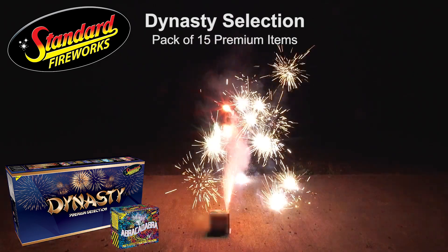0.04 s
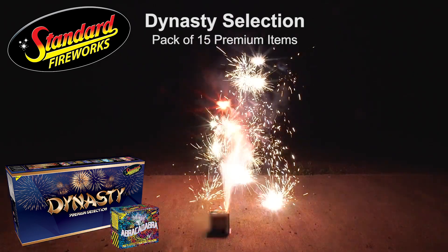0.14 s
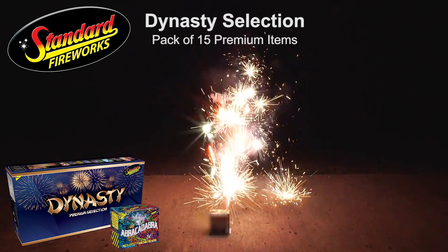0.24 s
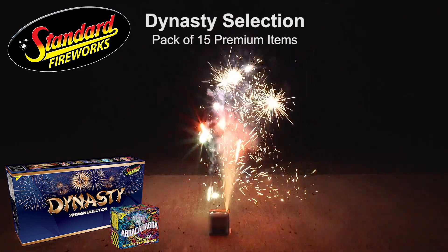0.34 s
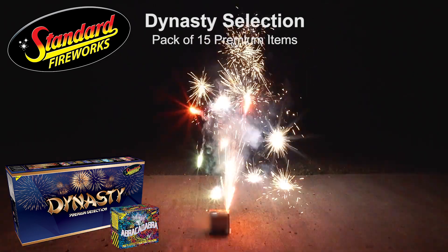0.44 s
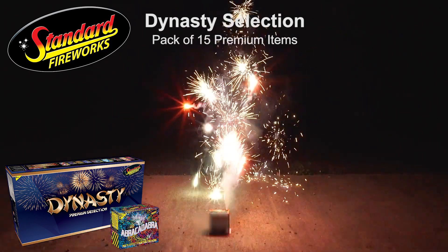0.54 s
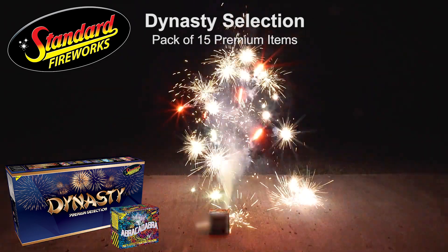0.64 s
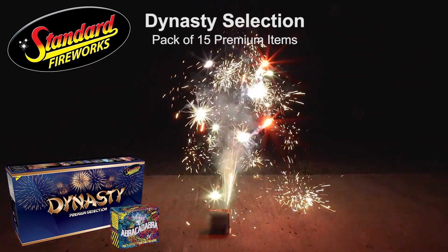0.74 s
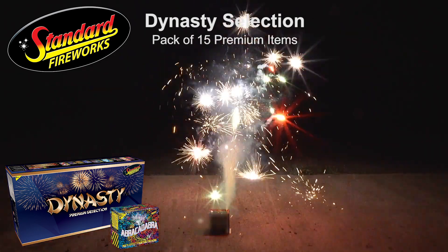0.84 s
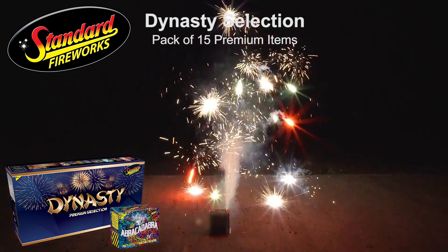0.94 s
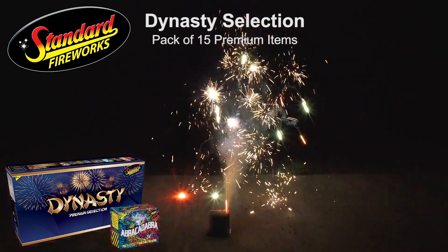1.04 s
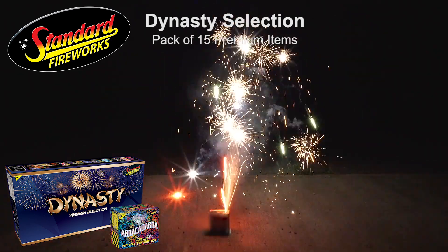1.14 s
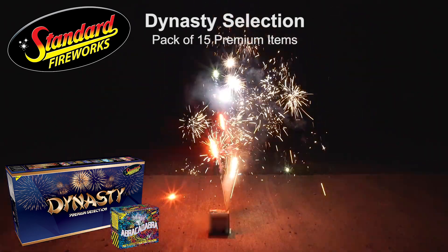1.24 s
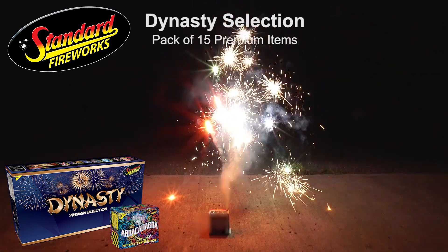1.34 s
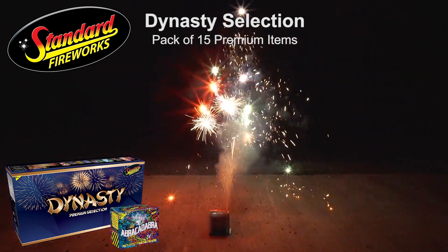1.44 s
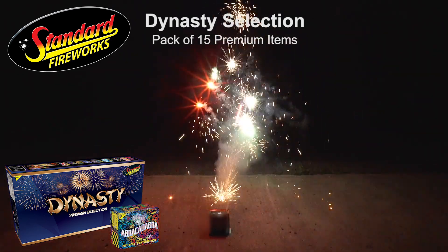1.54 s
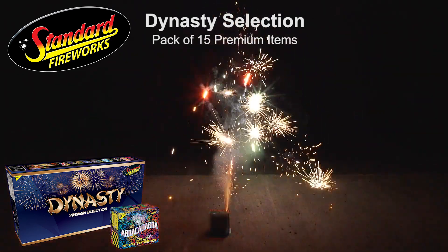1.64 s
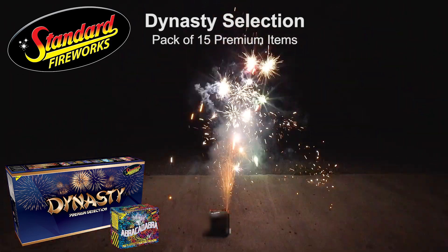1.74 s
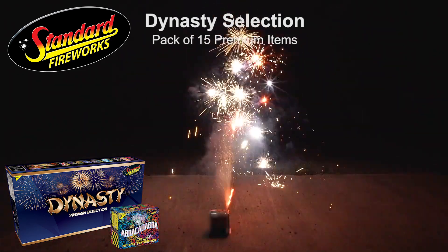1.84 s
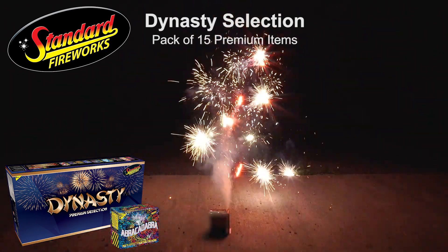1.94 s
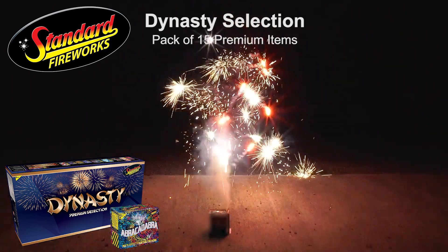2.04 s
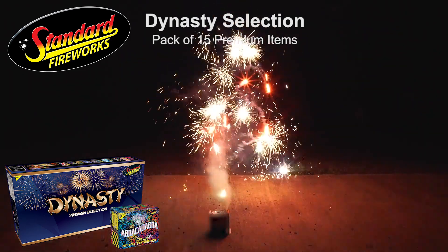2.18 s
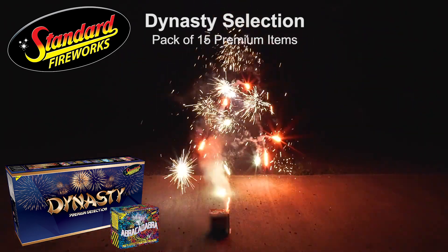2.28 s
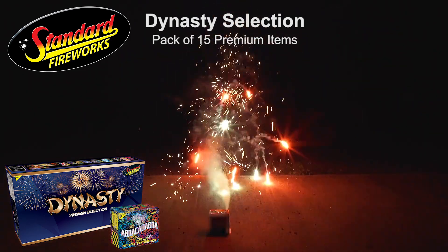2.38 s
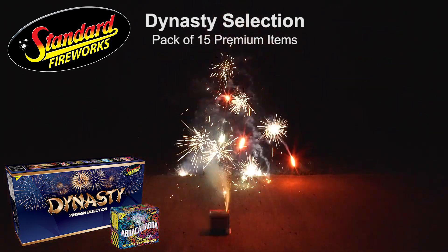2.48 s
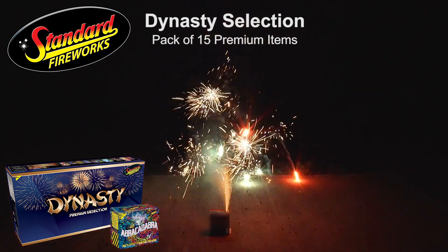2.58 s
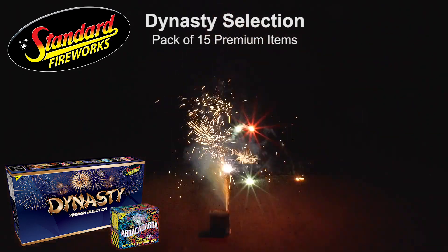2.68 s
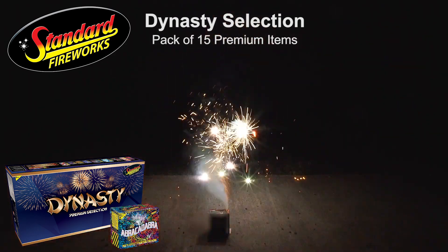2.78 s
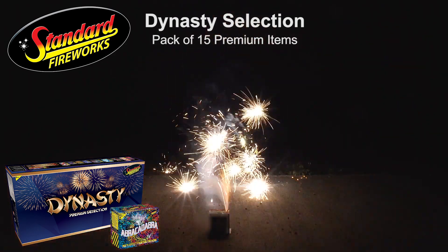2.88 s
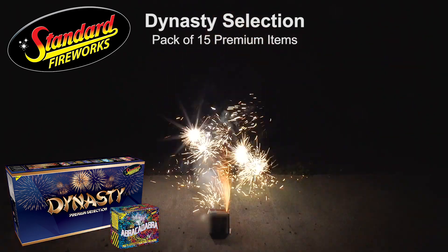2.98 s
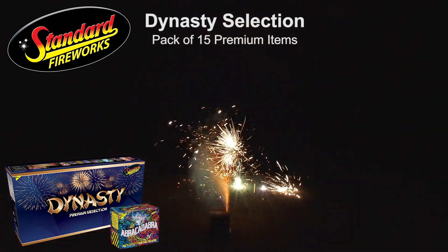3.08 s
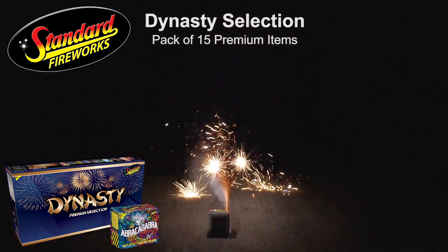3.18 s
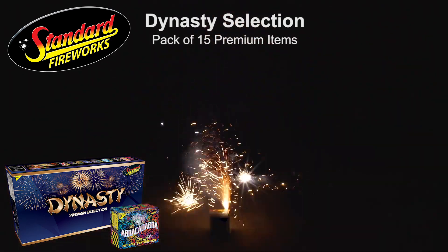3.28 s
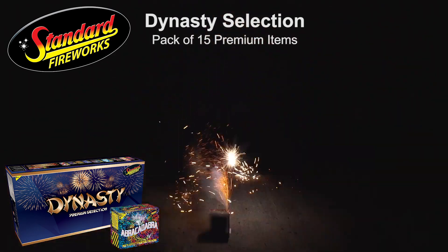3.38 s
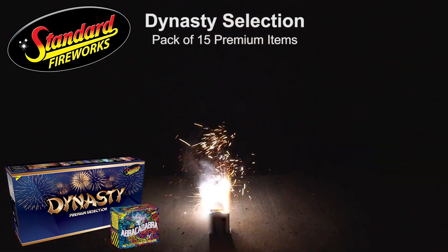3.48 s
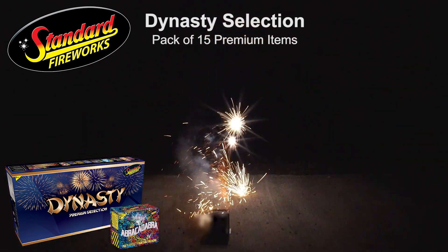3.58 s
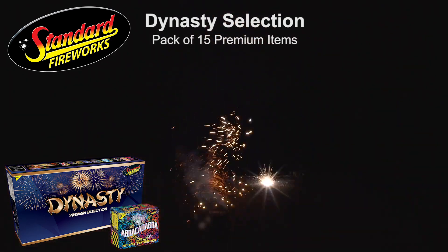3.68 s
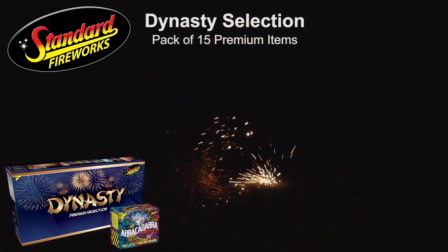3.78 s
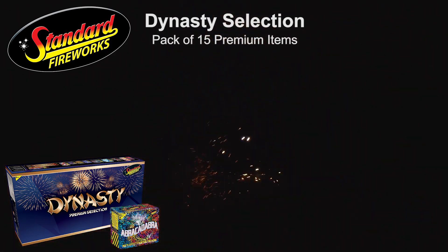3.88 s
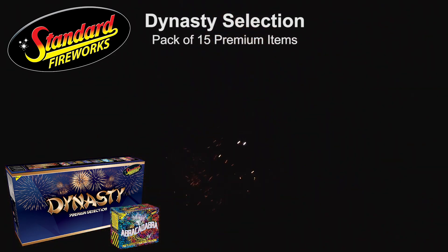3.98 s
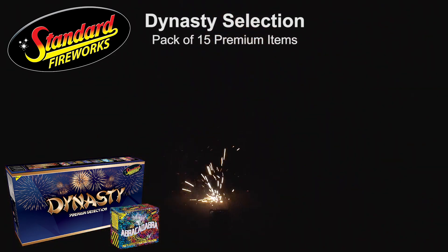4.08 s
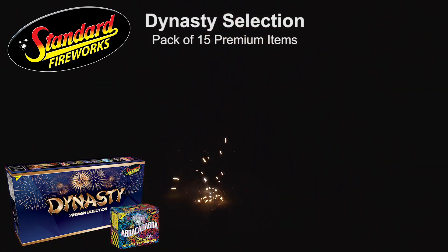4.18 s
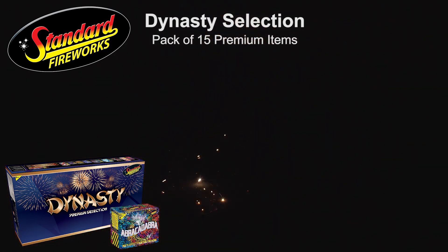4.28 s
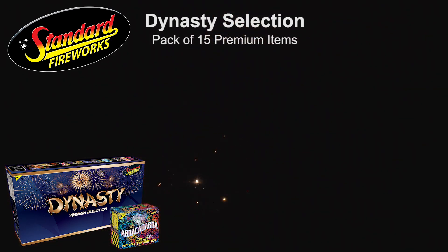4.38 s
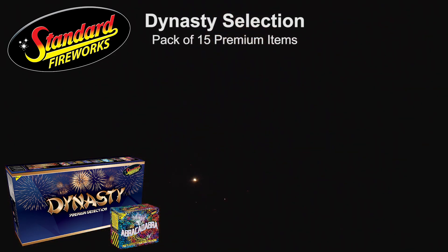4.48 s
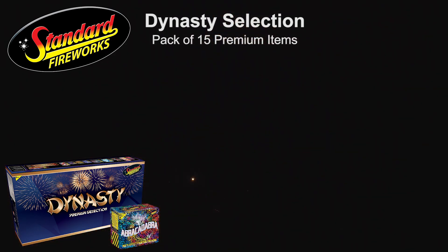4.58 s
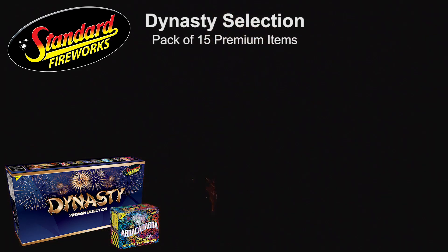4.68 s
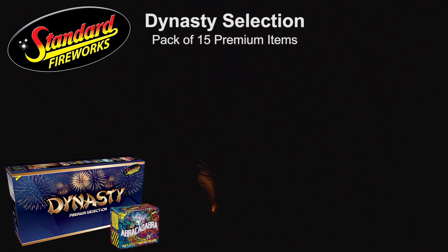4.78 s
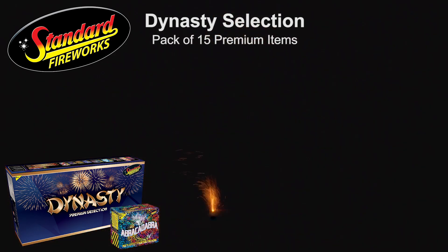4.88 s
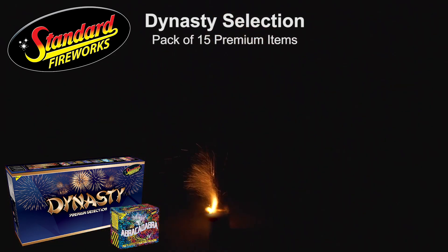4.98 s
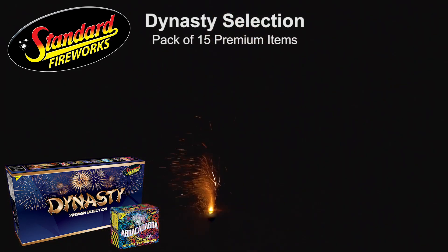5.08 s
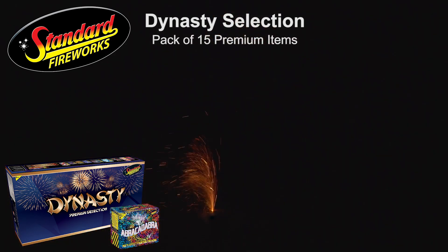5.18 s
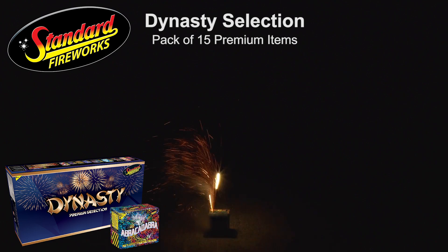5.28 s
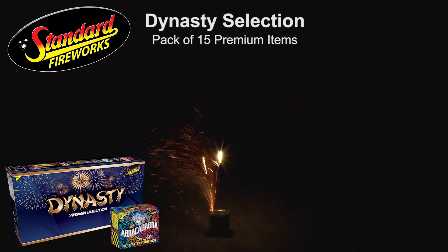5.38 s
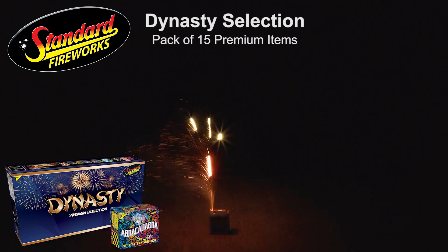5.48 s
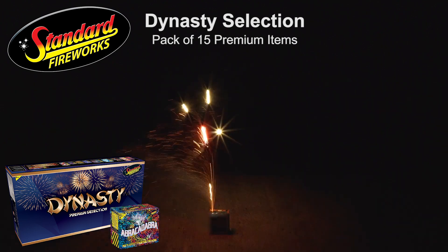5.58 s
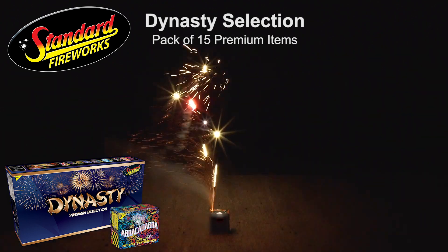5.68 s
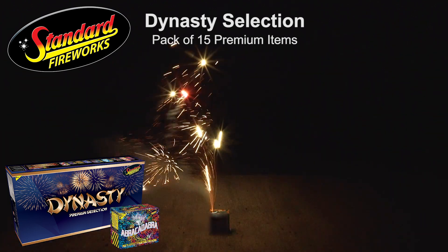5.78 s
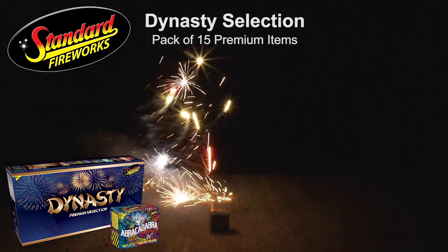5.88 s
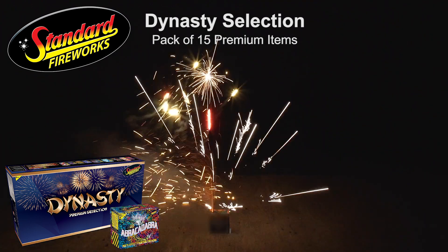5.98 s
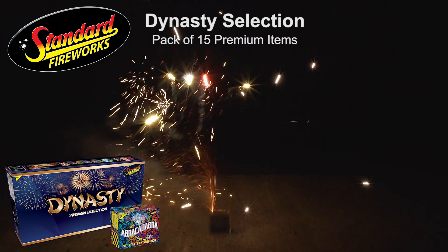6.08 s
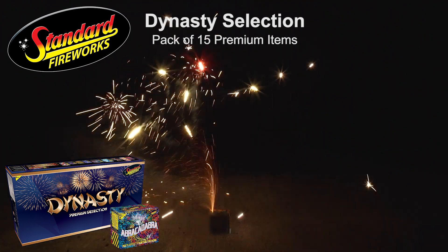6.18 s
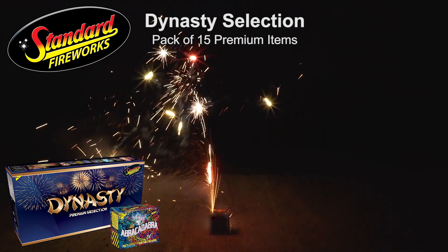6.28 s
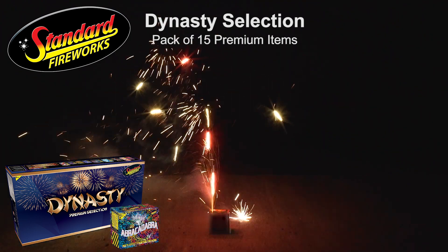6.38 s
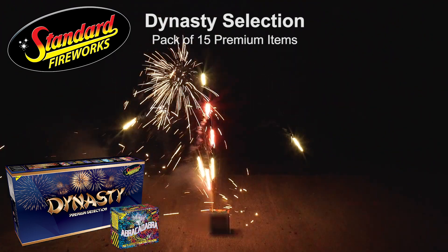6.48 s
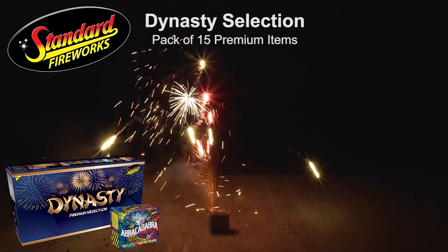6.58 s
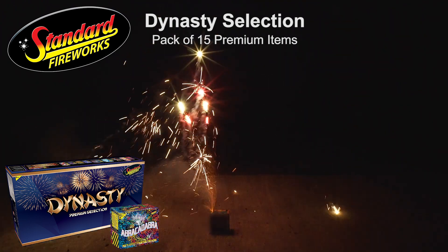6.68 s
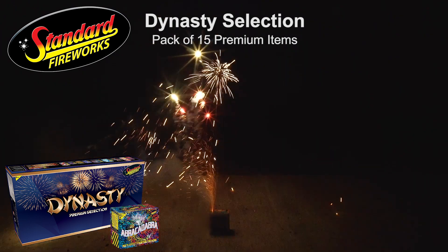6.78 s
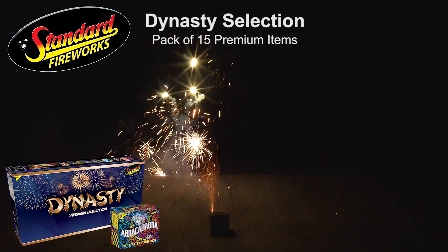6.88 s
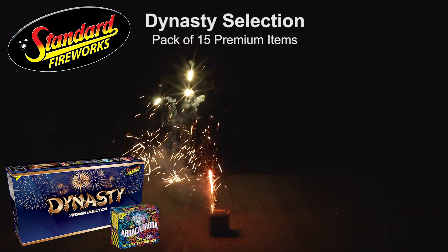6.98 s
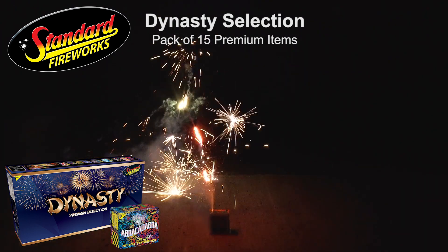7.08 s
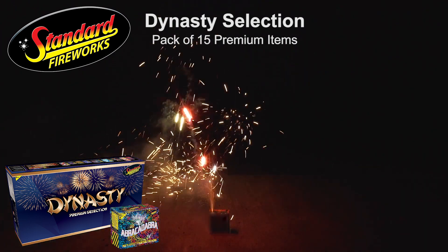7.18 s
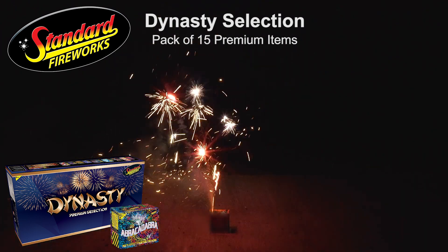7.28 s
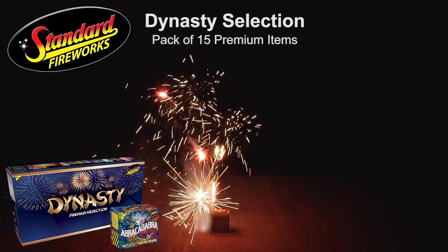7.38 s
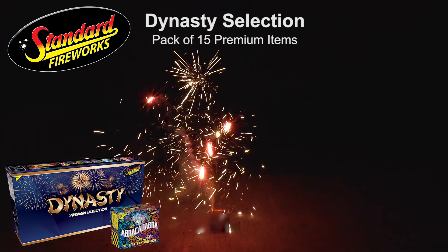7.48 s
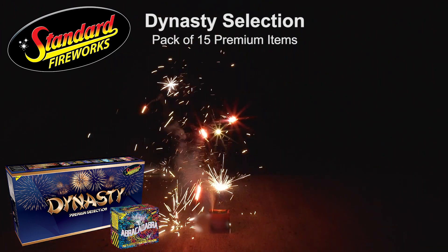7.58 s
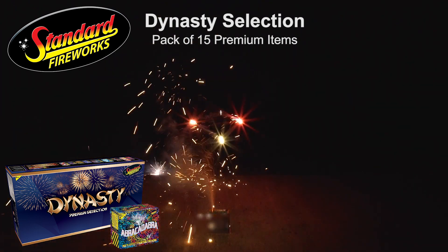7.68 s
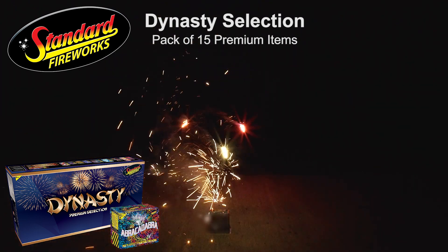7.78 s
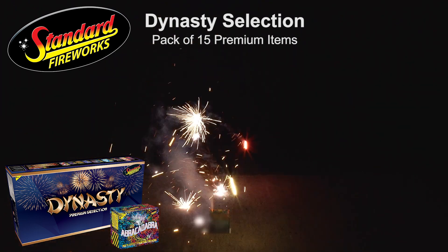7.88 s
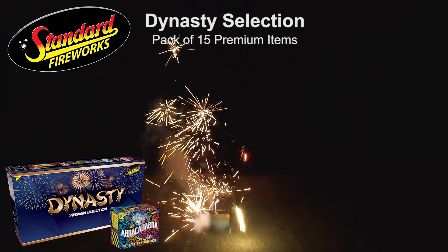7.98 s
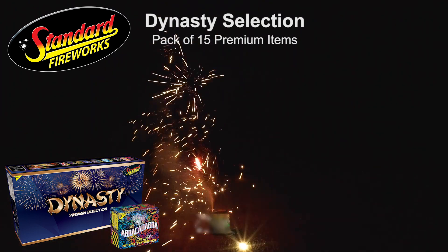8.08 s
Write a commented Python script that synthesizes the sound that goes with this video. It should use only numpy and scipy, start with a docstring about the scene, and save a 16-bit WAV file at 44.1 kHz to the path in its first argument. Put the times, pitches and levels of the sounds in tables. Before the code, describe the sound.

Dense crackling and hiss from a ground firework fade to a lull, then the hiss returns with sharp single pops.

```python
"""Outdoors at night, a small fountain firework burns on boards a few metres from a stereo microphone.
Its gas jet hisses and its stars break up in short flurries of tiny blasts, with a few sharp pops.
The fountain dies down and sputters in its tube; a second charge lights with a hiss and throws many
stars that burst in single pops. The ground echoes every blast, and fences and walls answer faintly.
Flame and breeze flutter low underneath."""
import sys
import numpy as np
from scipy import signal
from scipy.fft import rfft, irfft, next_fast_len
from scipy.io import wavfile
from scipy.ndimage import uniform_filter1d

SR = 44100
rng = np.random.default_rng(int(sys.argv[2]) if len(sys.argv) > 2 else 0)


def generate_wav(sig):
    """Save sig (samples, or channels by samples) to the path in sys.argv[1] as 16-bit PCM at SR."""
    pcm = np.round(np.clip(np.atleast_2d(sig).T, -1, 1) * 32767).astype(np.int16)
    wavfile.write(sys.argv[1], SR, pcm)


N = 358974
LEFT_LAG_US = 36.1  # the right microphone port is nearer the firework
RELIGHT_S = 4.5  # divides the first charge from the second

# the loudest stars crackling apart: t/s, level/dB, length/ms
FLURRIES = [(0.015, -35, 26), (0.061, -37, 59), (0.198, -34, 36), (0.243, -37, 29), (0.299, -34.5, 4.6),
            (0.315, -32.5, 5.2), (0.356, -35.5, 18.5), (0.394, -31.5, 11.6), (0.463, -33.5, 27),
            (0.511, -36, 16), (0.591, -35, 28), (0.622, -35, 59.7), (0.822, -33, 32), (0.927, -33, 19.8),
            (0.967, -35, 14.6), (1.051, -36, 13.8), (1.075, -37.5, 47), (1.158, -38, 32),
            (1.246, -39.5, 11), (1.262, -39, 35), (1.298, -37.5, 43.6), (1.426, -38, 16.3),
            (1.449, -35.5, 13), (1.477, -36.5, 20), (1.517, -36.5, 7.4), (1.564, -40, 13),
            (1.712, -36.5, 43), (1.827, -36.5, 35), (1.9, -37.5, 20), (1.932, -31.5, 3.2),
            (1.97, -38.5, 52), (2.028, -37, 65), (2.105, -37.5, 44.5), (2.153, -35, 11), (2.224, -39, 42),
            (2.295, -40, 10), (2.411, -34.5, 9.5), (2.433, -38, 27), (2.467, -43, 32), (2.505, -36.5, 13),
            (2.531, -39.5, 13), (2.583, -41, 9), (2.62, -43, 27), (2.664, -42.5, 26), (2.71, -39.5, 15.4),
            (2.735, -40.5, 13), (2.778, -36.5, 28), (2.818, -42, 11.5), (2.849, -36.5, 70),
            (2.927, -37, 13.4), (2.952, -40, 9.1), (3, -39.5, 14.6), (3.018, -47, 12), (3.05, -36, 12.5),
            (3.108, -41, 10.6), (3.134, -36.5, 6.6), (3.153, -43, 12), (3.169, -40.5, 13.3),
            (3.203, -42, 15), (3.236, -41.5, 26.4), (3.292, -42, 9), (3.37, -41, 36.4), (3.483, -37, 15),
            (3.521, -37.5, 13.3), (3.545, -43, 19.4), (3.576, -45, 9), (3.692, -40, 26),
            (3.995, -42.5, 25.5), (5.607, -38, 11.5), (5.814, -36, 14.5), (5.837, -34.5, 16.5),
            (5.861, -32, 11.4), (5.886, -33.5, 3.4), (5.979, -41.5, 8.8), (5.998, -40, 7.9),
            (6.096, -28.5, 4.2), (6.12, -40.5, 5.6), (6.213, -31.5, 21.6), (6.277, -40.5, 27.6),
            (6.531, -41, 10.7), (6.655, -44, 15), (6.866, -35, 11.3), (6.996, -38, 9.2),
            (7.049, -30.5, 6.9), (7.0743, -32.5, 11), (7.189, -41, 7.2), (7.239, -35.5, 9.5),
            (7.397, -32, 4.3), (7.627, -36.5, 5.3), (7.694, -34.5, 8.2), (7.719, -36, 8.3),
            (7.855, -40.5, 12.4), (7.913, -38, 39.5)]


def gain_of(db):
    return 10 ** (np.asarray(db) / 20)


def db_at_hz(curve, hz):
    """Read a curve of f/Hz, level/dB on a log frequency axis."""
    f, db = np.transpose(curve)
    return np.interp(np.log(hz + 1), np.log(f + 1), db)


def db_over_time(curve):
    """Read a curve of t/s, level/dB at every sample."""
    return np.interp(np.arange(N) / SR, *np.transpose(curve))


def add(mix, s, sound):
    part = mix[:, round(s * SR):][:, :sound.shape[1]]
    part += sound[:, :part.shape[1]]


def noise(tone, likeness, patchy_db):
    """Shaped stereo noise with drifting patches, rms 1; likeness of left and right runs from 0 to 1."""
    frames, hz = N // 256 + 5, np.fft.rfftfreq(1024, 1 / SR)
    a, b, c, d, patches = rng.standard_normal((frames, 513, 5)).T
    patches = uniform_filter1d(uniform_filter1d(patches, size=10, axis=0), size=8, axis=1)
    right = a + 1j * b
    left = likeness * right + np.sqrt(1 - likeness ** 2) * (c + 1j * d)
    shape = gain_of(db_at_hz(tone, hz)[:, None] + patchy_db * patches / patches.std())
    x = signal.istft(np.array([left, right]) * shape, nperseg=1024, noverlap=768)[1][:, :N]
    return x / x.std()


def night_air():
    """The quiet night all around the microphone, mostly bass."""
    # spectrum of the night: f/Hz, level/dB
    tone = [(20, -10.5), (90, -11.5), (530, -46), (1500, -32), (16000, -61)]
    return gain_of(-71.5) * noise(tone, likeness=.11, patchy_db=3)


def flutter():
    """Flame and breeze flutter low, unlike left and right."""
    # strength of the flutter: t/s, level/dB
    strength = [(0, -56.5), (3.2, -63.5), (3.7, -80.5), (7.1, -76), (7.2, -59), (7.35, -63.5), (8.14, -69)]
    tone = [(20, -5), (100, -12), (300, -23.5), (450, -41)]  # f/Hz, level/dB
    return gain_of(db_over_time(strength)) * noise(tone, likeness=0, patchy_db=2)


def jet():
    """Gas hisses from a nozzle so low that its ground echo cuts a notch near 2.4 kHz."""
    # gas flow of both charges: t/s, level/dB
    flow = [(0, -49), (3.36, -65.5), (3.39, -52), (3.49, -56), (3.52, -68.5), (4.6, -88), (4.62, -63),
            (4.745, -47), (4.765, -67), (4.84, -64.5), (4.95, -51.5), (4.99, -64), (5.6, -54.5),
            (8.14, -62.5)]
    # spectrum at the nozzle: f/Hz, level/dB
    tone = [(500, -15.5), (1200, -3.5), (1900, 2), (5000, -1.5), (9500, -5), (16000, -7.5)]
    # extra gain below the notch, thin while the flame relights: t/s, level/dB
    body = [(3.6, 4.5), (4.6, -10), (5.0, 2.5)]
    hiss = noise(tone, likeness=.74, patchy_db=1.3) * gain_of(db_over_time(flow))
    hz = np.fft.rfftfreq(N, 1 / SR)
    jw = 2j * np.pi * hz
    ground = 1 + np.exp(-jw * 206e-6) / (1 + abs(jw / 30000) ** 4)  # the echo loses its treble
    spectrum = rfft(hiss) * ground
    spectrum[0] *= np.exp(-jw * LEFT_LAG_US * 1e-6)
    low = hz < 2430
    return irfft(spectrum * ~low, N) + irfft(spectrum * low, N) * gain_of(db_over_time(body))


def blasts(clicks, blast_us, lag_us):
    """Each click becomes a push-and-suck blast wave that reaches the left port lag_us later."""
    size = next_fast_len(len(clicks) + 1024)
    jw = 2j * np.pi * np.fft.rfftfreq(size, 1 / SR)
    u = jw * blast_us * 1e-6
    wave = u / (1 + u) ** 2  # spectrum of (1 - t) exp(-t)
    puff = 7 * u / (1 + 7 * u) ** 2  # the hot gas spreads more slowly
    right = rfft(clicks, size) * (wave + gain_of(-11) * puff)
    return irfft([right * np.exp(-jw * lag_us * 1e-6), right], size)


def flurry(s, level_db, ms, traits, per_s=3000, spread_db=4, fade_db=4, rise_ms=1.12):
    """One star crackles: grains of uneven size burst in a quick swell, each with its ground echo."""
    coarseness, height, bearing = traits  # each from 0 to 1
    n = max(int(ms * SR / 1000), 8)
    size_db = spread_db * np.minimum(rng.exponential(1, n), 4) - fade_db * np.arange(n) / n
    swell = signal.windows.tukey(n, min(2 * rise_ms / ms, .5))
    grains = gain_of(size_db) * (rng.random(n) < per_s / SR) * swell
    echo_ms = (.3 + 2.2 * height) * (1 + .16 * rng.random(n))  # each grain bursts at its own height
    echoes = np.bincount(np.arange(n) + (echo_ms * SR / 1000).astype(int), grains)
    clicks = gain_of(-6.5) * echoes + np.pad(grains, (0, len(echoes) - n)) + 1e-9
    blast_us = (42 if s < RELIGHT_S else 25) * (1 + 1.43 * coarseness)  # the first charge is coarser
    lag_us = LEFT_LAG_US + 40 * (bearing - .5)
    fine = rng.random(len(clicks)) < .5  # two grain sizes
    x = blasts(clicks * ~fine, blast_us, lag_us) + blasts(clicks * fine, .42 * blast_us, lag_us)
    return gain_of(level_db) * x / np.sqrt((x[1] ** 2).sum() / n)


def spent_tube():
    """Last sputters of coarse grains, close to the ground, ring the empty tube."""
    # sputters that drive the tube: t/s, level/dB, length/ms
    sputters = [(3.968, -50, 75), (4.195, -73.5, 55)]
    # resonances of the tube: f/Hz, width/Hz, level/dB
    modes = [(732, 57, 21.5), (865, 80, 13), (1400, 1000, 9.5), (3540, 2100, 3.5)]
    drive = np.zeros((2, N))
    for s, db, ms in sputters:
        add(drive, s, flurry(s, db, ms, [.5, 0, .5], per_s=1500, fade_db=13, rise_ms=6.5))
    peaks = [(db, np.hstack(signal.iirpeak(hz, hz / width, SR))) for hz, width, db in modes]
    return sum(gain_of(db) * signal.sosfilt([peak, peak], drive) for db, peak in peaks)


def small_stars():
    """Smaller stars break up one after another in the gaps between the loud ones."""
    # spells of small stars: start t/s, end t/s, share of free slots filled
    spells = [(0, 1.26, .85), (1.57, 2.3, .8)]
    slot_s, hush_s = .022, .006  # at most one star to a slot; a short hush before a loud one
    starts, _, lengths_ms = np.transpose(FLURRIES)
    ends = starts + lengths_ms / 1000
    out = np.zeros((2, N))
    for slot, (offset, luck, loud, long, *traits) in enumerate(rng.random((int(N / SR / slot_s), 7))):
        s = (slot + offset / 2) * slot_s
        free = not np.any((starts - hush_s < s + slot_s / 2) & (ends > s))
        if free and any(start <= s < end and luck < share for start, end, share in spells):
            add(out, s, flurry(s, level_db=-41 + 2 * loud, ms=10 + 7.7 * long, traits=traits))
    return out


def stars():
    """Loud stars crackle apart, with faint ones at random and a running spatter of the finest sparks."""
    # fine sparks filling the air: t/s, level/dB
    spatter = [(0, -50), (1.3, -50.5), (1.36, -58.5), (2.05, -48.5), (2.35, -62), (2.9, -53.5),
               (3.5, -67.5), (4.4, -92), (5.58, -77), (5.85, -54), (8.14, -58.5)]
    spatter_db = db_over_time(spatter)
    out = np.zeros((2, N))
    for (s, db, ms), traits in zip(FLURRIES, rng.random((len(FLURRIES), 3))):
        add(out, s, flurry(s, db, ms, traits))
    for when, loud, long, *traits in rng.random((220, 6)):
        s = when * N / SR
        add(out, s, flurry(s, spatter_db[int(when * N)] + 9 * loud, ms=3 + 12 * long, traits=traits))
    finest = flurry(0, 0, 1000 * N / SR, [.3, .4, .5], per_s=6000, spread_db=7.5, fade_db=0)[:, :N]
    return out + finest * gain_of(spatter_db)


def pops():
    """A star bursts all at once: one blast, its ground echo and a moment of crackling splinters."""
    # bursting stars: t/s, level/dB, ground echo delay/ms
    bursts = [(0.168, -8.5, 2.7), (1.815, -2.5, 2.18), (2.963, -14.5, 0.75), (3.1905, -13, 0.54),
              (5.7281, -9.5, 0.31), (5.9252, 5.5, 0.2), (6.145, -14.5, 0.36), (6.4465, -2.5, 1.66),
              (6.7253, -11, 1.68), (6.797, -6, 0.9), (7.0176, -16.5, 0.74), (7.0598, -15, 3),
              (7.0629, -8.5, 0.88), (7.0829, -11.5, 0.25), (7.2958, -6, 1.39), (7.3453, -4.5, 0.23),
              (7.4096, -5.5, 0.63), (7.4112, -3.5, 0.68), (7.449, -13.5, 1.65), (7.5545, -9.5, 5.6),
              (7.9011, -7.5, 2), (8.0424, -9, 1.58)]
    out = np.zeros((2, N))
    for (s, db, echo_ms), traits in zip(bursts, rng.random((len(bursts), 3))):
        blast_us = 17 + 26 * gain_of(db)  # a bigger blast lasts longer
        blast = blasts(np.ones(1), blast_us, lag_us=LEFT_LAG_US + 14 * (traits[2] - .5))
        blast *= gain_of(db) / blast[1].max()
        add(out, s, blast)
        add(out, s + echo_ms / 1000, gain_of(-3.2 * echo_ms) * blast)  # higher star: later, weaker echo
        add(out, s, flurry(s, .5 * db - 29.5, ms=7, traits=traits, fade_db=11, rise_ms=.5))
    return out


def scatter(x, after_s, t60_s, band_hz):
    """Many small surfaces send the sound back, with a separate tail for each port."""
    t = np.arange(SR // 4) / SR
    tail = rng.standard_normal((2, len(t))) * gain_of(-60 * t / t60_s) * (t > after_s)
    tail = signal.lfilter(*signal.butter(1, band_hz, "band", fs=SR), tail)
    return signal.fftconvolve(x, tail / np.linalg.norm(tail[0]), axes=1)[:, :N]


def scene():
    """From a few metres: sparks and their reflections over the jet, the flutter and the night."""
    sparks = small_stars() + stars() + pops() + spent_tube()
    near = scatter(sparks, after_s=.0002, t60_s=.01, band_hz=[3000, 14000])  # microphone housing, boards
    far = scatter(sparks, after_s=.00058, t60_s=.21, band_hz=[400, 4000])  # fences and walls
    return sparks + gain_of(-19) * near + gain_of(-27.5) * far + jet() + flutter() + night_air()


def record(dry):
    """The microphone colours each port, overloads near full scale and cuts off at 16.3 kHz."""
    # microphone response: f/Hz, level/dB
    response = [(280, 2), (370, 0), (600, 8.5), (2600, 2), (8000, 2), (9800, 3), (11000, -3.5),
                (16000, -5.5)]
    # left port relative to the right: f/Hz, level/dB
    balance = [(60, 1), (290, -5.5), (1400, -1.5), (12000, -2.5)]
    hz = abs(np.fft.fftfreq(4096, 1 / SR))
    log_gain = np.log(gain_of(db_at_hz(response, hz) + np.outer([1, 0], db_at_hz(balance, hz))))
    minimum_phase = -signal.hilbert(log_gain).imag
    taps = np.fft.ifft(np.exp(log_gain + 1j * minimum_phase)).real[:, :2048]
    coloured = signal.oaconvolve(dry, taps, axes=1)[:, :N]
    overloaded = np.clip(coloured, -.88, .88)
    lowpass = signal.firwin(255, 16300, window=("kaiser", 9), fs=SR)
    return signal.oaconvolve(overloaded, lowpass[None], "same")


dry = scene()
out = record(dry)
generate_wav(out)
```